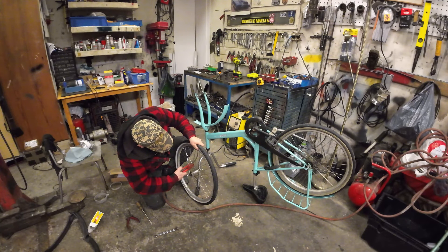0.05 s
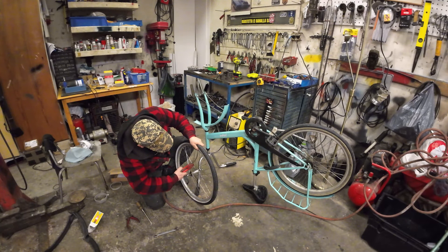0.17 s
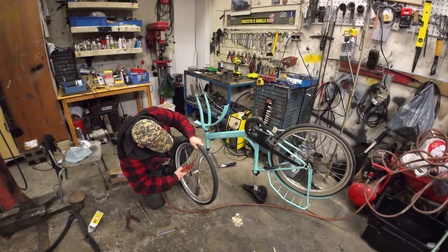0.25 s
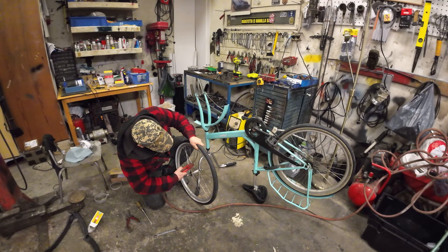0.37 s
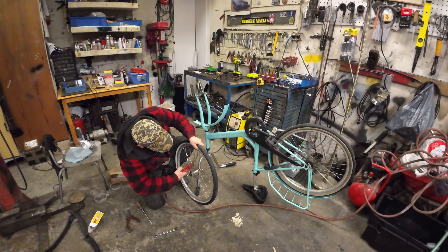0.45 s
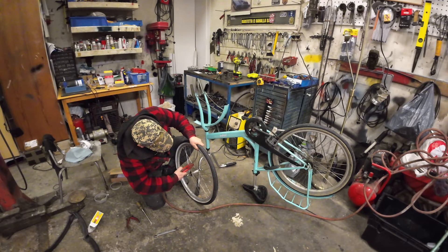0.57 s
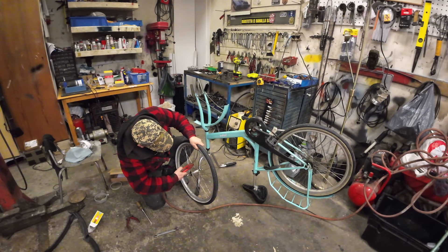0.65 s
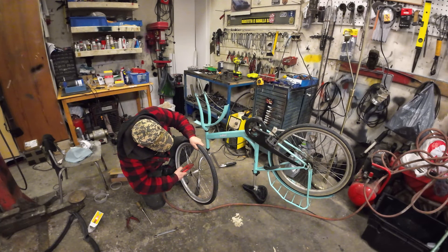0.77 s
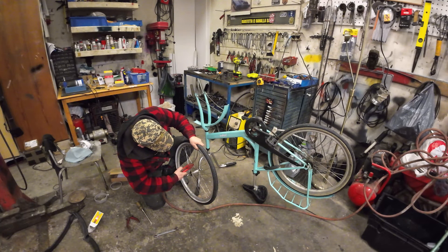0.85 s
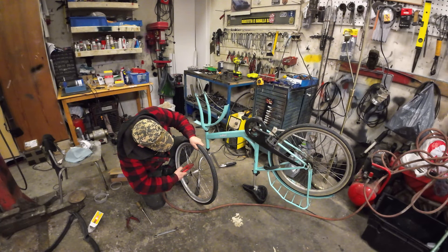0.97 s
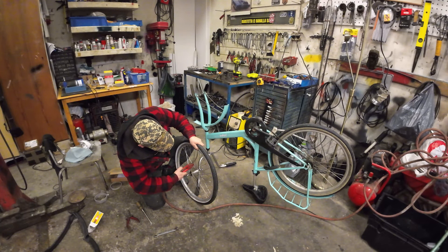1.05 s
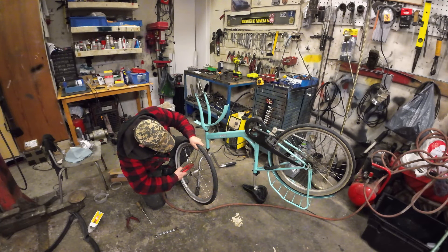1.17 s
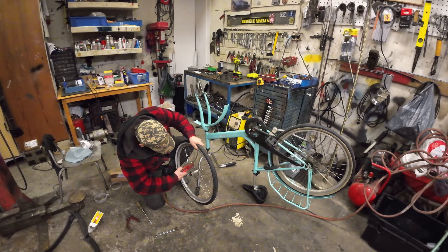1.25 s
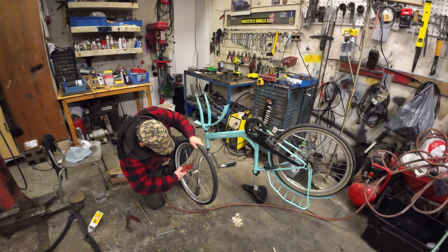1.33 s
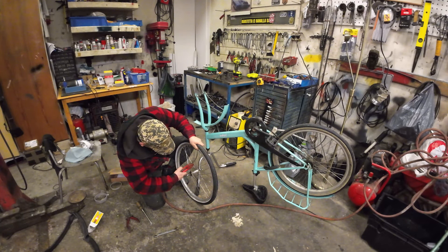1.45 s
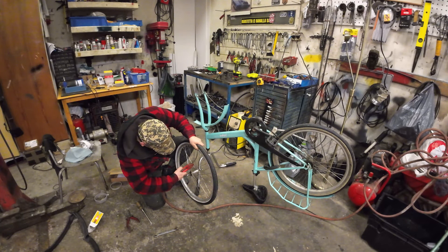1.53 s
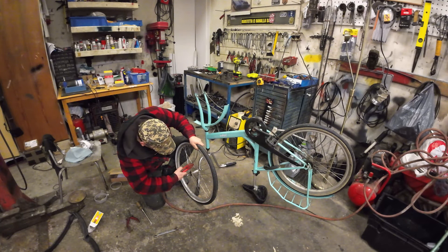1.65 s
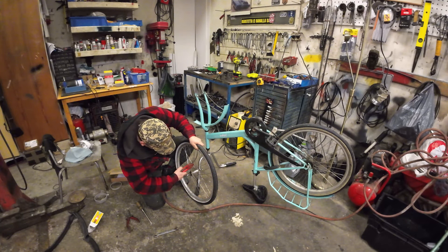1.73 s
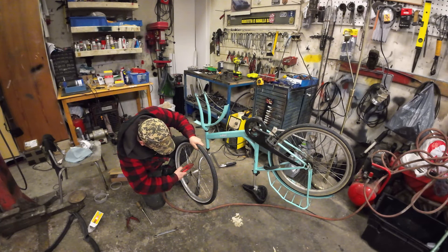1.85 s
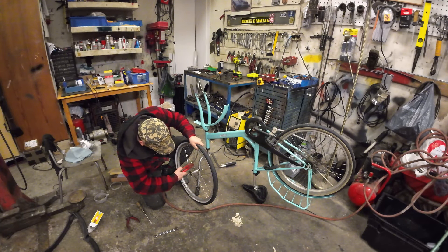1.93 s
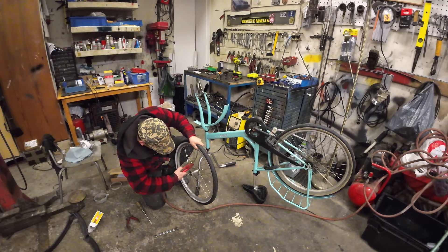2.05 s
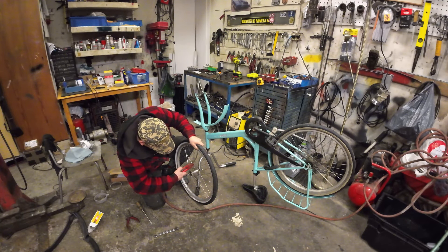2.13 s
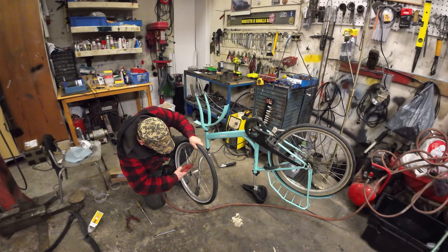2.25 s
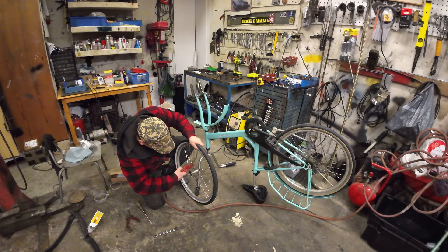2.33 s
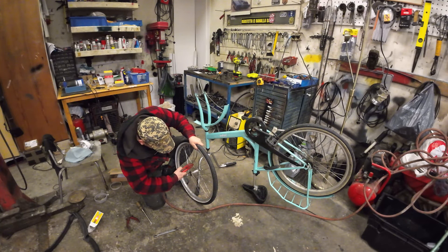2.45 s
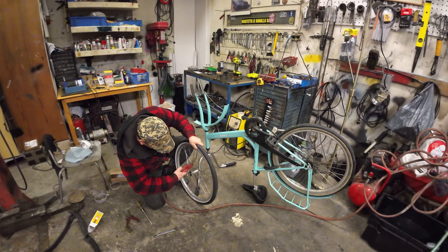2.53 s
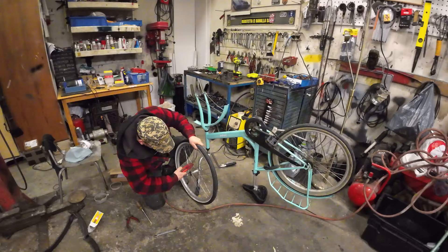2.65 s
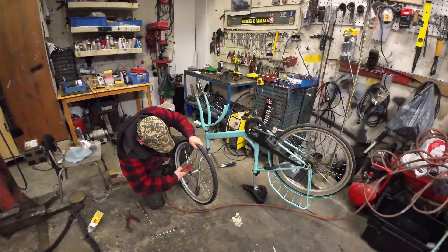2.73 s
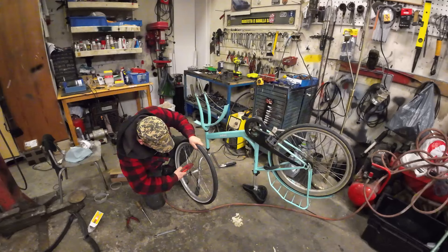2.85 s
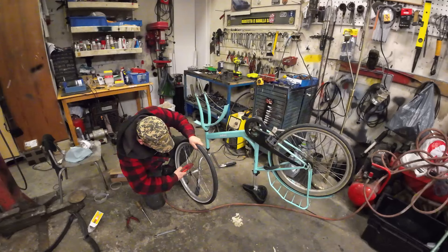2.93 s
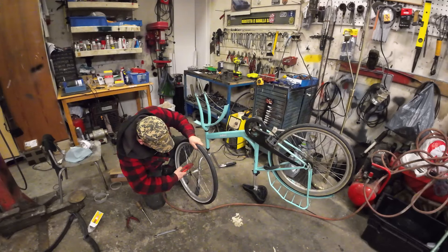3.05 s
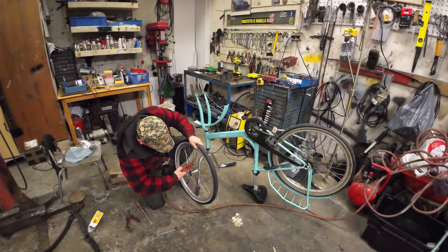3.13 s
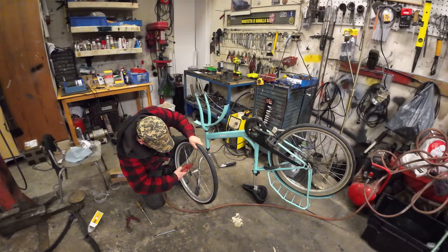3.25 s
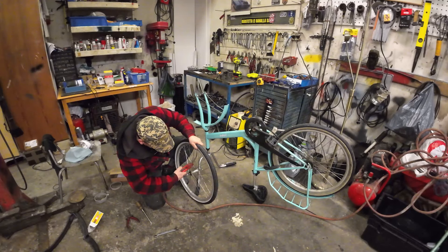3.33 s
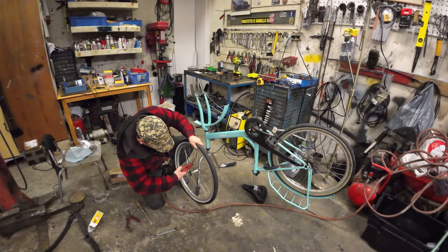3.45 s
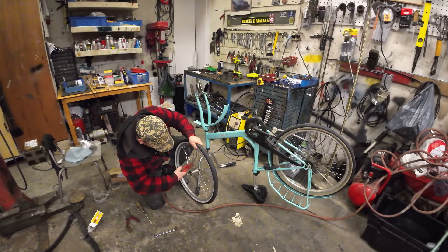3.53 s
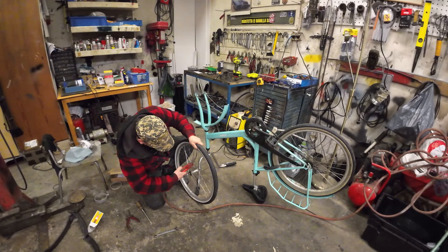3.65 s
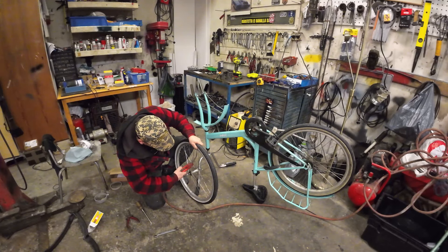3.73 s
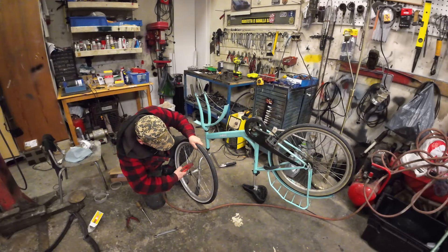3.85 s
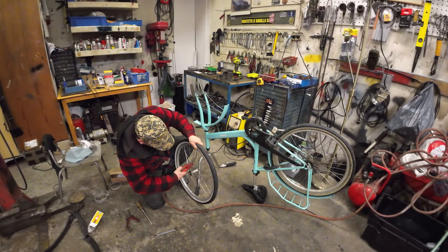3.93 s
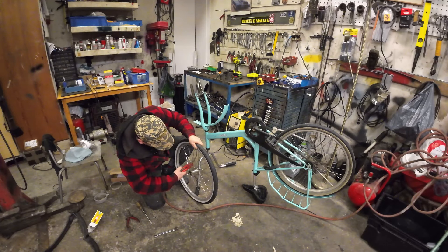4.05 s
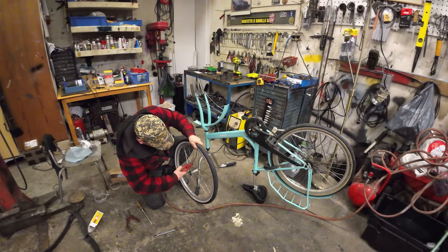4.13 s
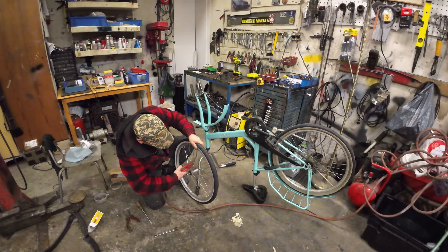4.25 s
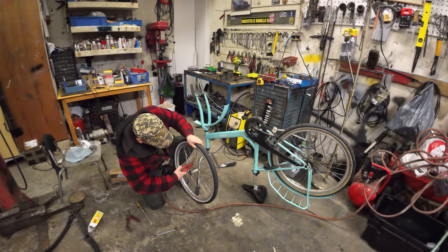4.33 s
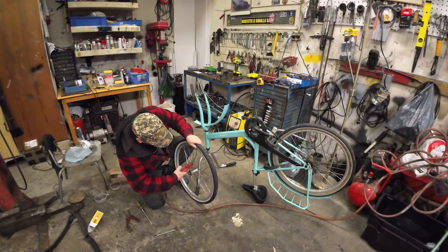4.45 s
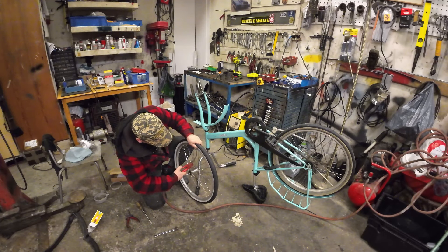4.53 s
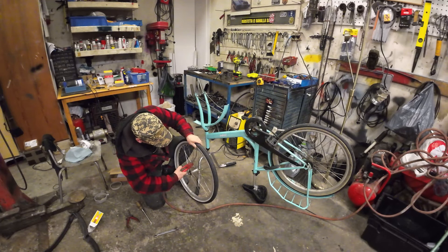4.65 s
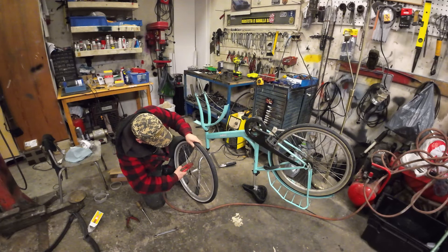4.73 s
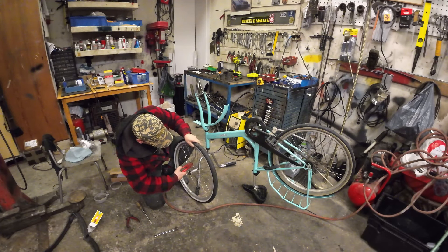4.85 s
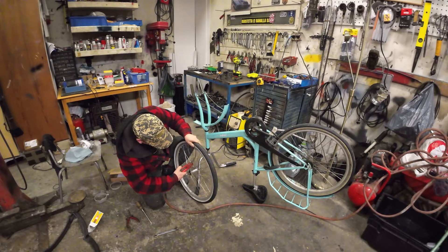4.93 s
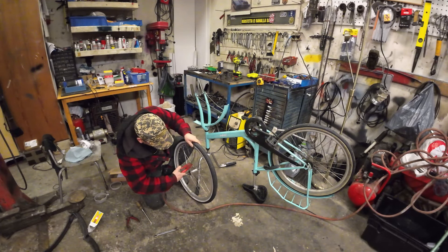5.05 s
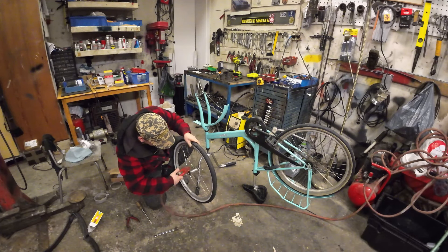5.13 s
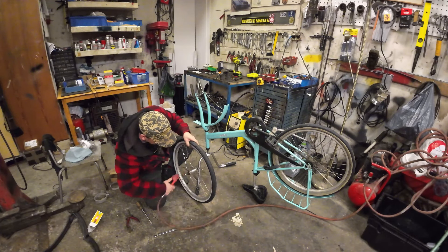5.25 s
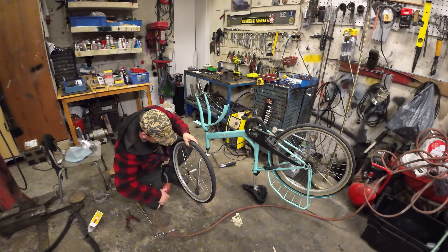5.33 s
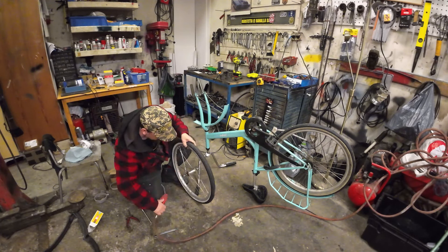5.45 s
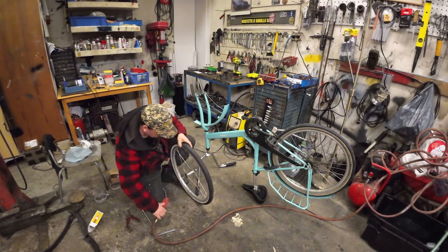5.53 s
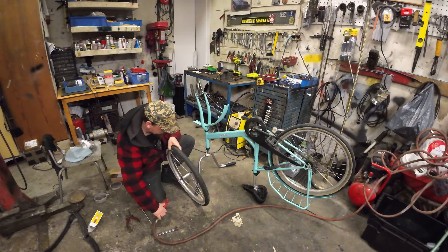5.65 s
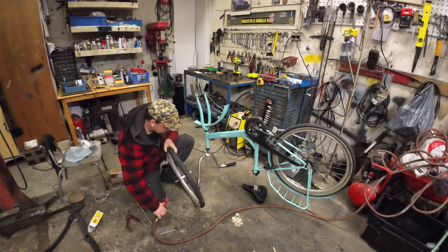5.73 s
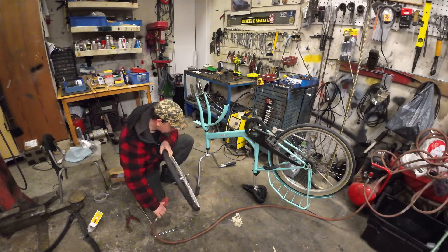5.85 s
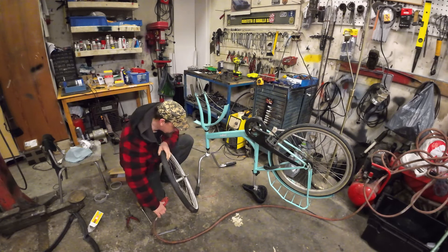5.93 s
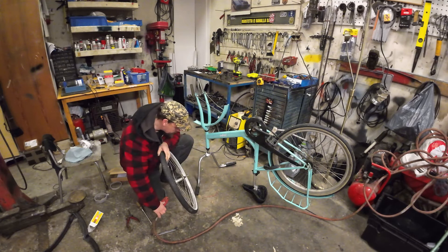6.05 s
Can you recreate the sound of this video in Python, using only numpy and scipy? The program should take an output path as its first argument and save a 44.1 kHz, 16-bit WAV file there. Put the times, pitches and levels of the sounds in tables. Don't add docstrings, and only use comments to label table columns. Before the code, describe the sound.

An air hose fills a bicycle tyre in a garage: sharp rushing hiss stops and restarts, then the nozzle pops off with clicks and cloth rustle.

```python
import sys
import numpy as np
from scipy import signal
from scipy.io import wavfile
from scipy.ndimage import uniform_filter1d

SR = 44100
rng = np.random.default_rng(int(sys.argv[2]) if len(sys.argv) > 2 else 0)


def pcm_store(signal):
    levels = np.round(np.clip(np.atleast_2d(signal), -1, 1) * 32767)
    wavfile.write(sys.argv[1], SR, levels.astype(np.int16).T)


def makeup_ratio(level_db):
    decades = np.asarray(level_db, float) / 20
    return 10 ** decades


N = 268568
FRAME_SAMPLES, STEP_SAMPLES = 512, 8

# opening in [s], shutting in [s], jet level in [dB],
# easing off before the shut in [s], first lift of the seat cavities in [dB].
PRESSES = [
    (-1.0, -0.034, -37.0, .05, -8),
    (0.141, 2.262, -33.1, .07, -1),
    (2.368, 3.47, -35.2, .14, 8),
    (3.6, 4.192, -36.5, .045, 3),
]
# frequency in [Hz], density in [dB per Hz].
JET_SPECTRUM = [(2060, -16), (3500, 0), (4550, -14), (5190, 3), (6800, 2), (7900, 2.05), (8630, 1.5),
                (9360, 4.5), (10300, 6.5), (12400, 4), (13800, 1), (14600, 5.5), (15300, 6.5), (15900, -1)]
# frequency in [Hz], density in [dB per Hz].
BODY_SPECTRUM = [(180, -46), (300, -7), (630, -7), (788, -2.5), (1180, -0.5), (2000, -2.5), (2350, -2),
                 (2620, -1), (3050, -5), (3950, -4.5), (5000, -6), (6500, -21), (11000, -120)]
# centre in [Hz], width in [Hz], steady lift in [dB], share of the seat lift in [0-1].
CAVITIES = [(816, 100, 1.5, .3), (1750, 130, 0, 0.44), (1970, 250, -1, .9), (2630, 540, 2.5, 0.5),
            (5050, 130, 3, 0.07), (7830, 390, 2.5, .4), (9300, 150, -3, 0.5), (9480, 250, 0.7, 0.84),
            (10600, 300, 2.5, 0.3), (11760, 170, 3.5, .3), (13300, 160, 1, .1), (14900, 200, 2.5, .1),
            (16000, 180, 0, .05)]
# frequency in [Hz], likeness in [0-1].
LEAK_LIKENESS = [(60, 0.51), (92, 0.54), (140, 0.58), (210, 0.57), (330, 0.6), (500, 0.95), (770, 1),
                 (1170, 1), (1790, 1), (2740, 1), (4190, 0.8), (6410, 0.61), (9810, 0.7), (15000, 0.8)]
# frequency in [Hz], lead in [rad].
LEFT_LEAD = [(0, 0), (4650, 0.0), (5860, 0.4), (6630, 0.2), (7920, 0.4), (8270, 0.3), (10200, 0.9),
             (10500, 0.9), (11600, 0.7), (12900, 0.2), (13200, 0.3), (14600, 0.8), (15400, 0.2),
             (16500, 0.1)]
# frequency in [Hz], left minus right in [dB].
LEFT_TILT = [(60, 14), (110, 13), (200, -2), (380, 2.5), (700, 0), (1290, 0.5), (2380, 0.5), (4400, 3),
             (8120, -1.5), (15000, 0.5)]
# time in [s], peak in [dB], brightness in [dB], T60 in [s].
PUFFS = [
    (5.1876, -32, -6, 0.035),
    (5.1946, -32.5, -7, 0.046),
    (5.2022, -39, -10, 0.045),
    (5.214, -37, -9, 0.033),
    (5.228, -48, -14, 0.06),
]
# resonance in [Hz], width in [Hz], level in [dB].
THROAT = [(800, 250, -12), (1780, 160, -4.5), (2250, 340, -1.5), (2740, 200, -2), (3550, 410, -4),
          (5330, 780, -2), (6330, 450, -2.5), (7630, 760, -4.5), (9600, 1300, -8), (11600, 1100, -8),
          (14500, 1500, -12)]
# time in [s], peak in [dB], centre in [Hz],
# width re centre in [ratio], bright edge in [dB].
KNOCKS = [(4.376, -46, 1900, 0.94, -16), (4.596, -54, 1480, .5, -27), (4.643, -41.5, 1980, 1.1, -12),
          (4.716, -50.5, 1100, 0.9, -21), (4.82, -52, 3160, .6, -27), (5.11, -53, 6750, .3, -16),
          (5.116, -55, 1500, 1.3, -20), (5.187, -43, 6300, .8, -11), (5.263, -45, 1400, 1.1, -22),
          (5.408, -48.5, 1050, .8, -26), (5.47, -44, 2100, 0.9, -13), (5.5, -55, 2700, 0.25, -22),
          (5.875, -59, 2400, .3, -26)]
# start in [s], hold in [s], level in [dB], fall in [dB per s],
# weight under 800 Hz in [dB].
MOVES = [(0.0, .1, -69, 60, -10), (3.5, .12, -63, 150, -1), (4.17, .11, -57.5, 75, 0.5),
         (4.3, .1, -62.5, 220, -4), (4.45, .1, -73, 100, -8), (4.588, .04, -66, 150, -7),
         (4.645, .08, -66, 90, 0.5), (4.77, .08, -67, 200, -14), (5.102, .018, -63, 600, -11),
         (5.19, .07, -58.5, 115, -4), (5.33, .13, -71, 60, -1), (5.466, .07, -54.5, 85, -5.5),
         (5.72, .1, -68.5, 40, -13), (5.87, .015, -66, 300, -16), (5.925, .03, -67, 55, -13)]
# frequency in [Hz], density in [dB per Hz].
RUSTLE_SPECTRUM = [(90, -25), (200, -11.5), (450, -1), (880, -6.5), (1500, -12), (2670, -11.5),
                   (4420, -18.5), (5900, -13.5), (7000, -19.5), (11200, -17.5), (13500, -30), (15800, -28)]
# frequency in [Hz], T60 in [s].
GARAGE_T60 = [(100, 0.25), (1000, 0.3), (4000, 0.6), (15000, 0.36)]
# multiple of the mains in [1], level in [dB rms].
HUM = [
    (2, -71.5),
    (6, -72.5),
    (8, -72.5),
    (10, -82),
    (14, -88.5),
    (24, -80),
    (28, -86),
    (31, -83),
    (39, -86),
]
# frequency in [Hz], density in [dB per Hz].
FLOOR_SPECTRUM = [(59, -27), (100, 1), (243, -11), (300, -6.5), (348, -17), (395, -5), (629, -20.5),
                  (1110, -16.5), (1210, -11.5), (1470, -17), (1810, -17), (4590, -24), (6040, -17.5),
                  (6580, -28), (15600, -31.5)]
# frequency in [Hz], likeness in [0-1].
FLOOR_LIKENESS = [(60, 0.02), (130, 0), (290, 0.6), (640, 0.67), (1410, 0.79), (3100, 0.7), (6820, 0.35),
                  (15000, 0)]

SNAP_S, SWELL_S, SWELL_DB = .015, .045, 9.5
SURGE_DB, SURGE_AT_S, SURGE_WIDTH_S, SURGE_FADES_S = 2.9, .14, .13, 2.5
SAG_DB, SAG_S, EASE_DB = 3.1, .8, 5.3
SEAT_REST_DB, SEAT_SETTLES_S = 3.0, 1.1
JET_FALL_DB_PER_S, BODY_FALL_DB_PER_S = 285, 122
BODY_DB, BODY_LATE_DB, BODY_LATE_S, BODY_SURGE_DB_PER_DB = -6.3, 8, .035, .7
RUMBLE_DB, RUMBLE_SAG_DB_PER_S, RUMBLE_GUSTS_DB = -45.7, 1.5, 1.5
RUMBLE_DB_PER_DB = 2.1
SEAT_SURGE_DB_PER_DB, RUMBLE_SURGE_DB_PER_DB = 1.3, 1.0
SEAT_SHIELD_DB_PER_DB = .6
PUSH_DB, STILL_AIR_DB, PUSH_GUSTS_DB, PUSH_SAG_DB_PER_S = -4.5, -67.5, 2.1, 1.3
KNOCK_T60_S, NARROW_T60_S = .006, .004
MOVE_ATTACK_S, GRIT_S, CATCHES_PER_S = .007, .004, 130
RIM_FROM_S, RIM_HZ, RIM_WIDTH_HZ, RIM_DB = 5.55, 2490, 110, -77.5
MAINS_HZ, FLOOR_DB = 50., -63


def rms_one(x):
    return x / np.sqrt(np.mean(x ** 2) + 1e-20)


def at_hz(points, hz):
    table = np.array(points)
    return np.interp(np.log(hz + 1), np.log(table[:, 0] + 1), table[:, 1])


def patches(shape, wide, long):
    field = rng.standard_normal(shape)
    for _ in range(2):
        field = uniform_filter1d(uniform_filter1d(field, wide, axis=0), long, axis=1)
    return rms_one(field)


def in_full(control):
    return np.repeat(control, STEP_SAMPLES)[:N]


def butter(x, order, hz, kind):
    return signal.sosfilt(signal.butter(order, hz, kind, fs=SR, output="sos"), x)


def resonance(x, hz, width_hz):
    r = np.exp(-np.pi * width_hz / SR)
    poles = [1, -2 * r * np.cos(2 * np.pi * hz / SR), r * r]
    return signal.lfilter([(1 - r * r) / 2, 0, (r * r - 1) / 2], poles, x)


def double_resonance(x, hz, width_hz):
    return resonance(resonance(x, hz, width_hz), hz, width_hz)


def air_noise(spectrum, likeness, patchy_db, surge_db, cavity_lift_db=None):
    white = rng.standard_normal((2, N + FRAME_SAMPLES))
    hz, s, (mid, side) = signal.stft(white, SR, nperseg=FRAME_SAMPLES)
    colour_db = at_hz(spectrum, hz)[:, None]
    if cavity_lift_db is not None:
        lift_db = np.interp(s, np.arange(N) / SR, cavity_lift_db)
        for centre_hz, width_hz, steady_db, share in CAVITIES:
            peak_db = steady_db + share * lift_db + 0.62 * patches((1, len(s)), 1, 40)
            colour_db = colour_db + peak_db / (1 + (2 * (hz[:, None] - centre_hz) / width_hz) ** 2)
    eddies_db = patchy_db * patches(mid.shape, 9, 12)
    gusts_db = surge_db * patches(mid.shape, 120, 4)
    gain = makeup_ratio(colour_db + eddies_db + gusts_db)
    alike = np.clip(at_hz(likeness, hz), 0, 1)[:, None]
    turn = np.exp(.5j * at_hz(LEFT_LEAD, hz))[:, None] * makeup_ratio(at_hz(LEFT_TILT, hz) / 2)[:, None]
    shared, apart = np.sqrt(1 + alike) * mid, np.sqrt(1 - alike) * side
    pair = gain * np.array([(shared + apart) * turn, (shared - apart) / turn])
    return rms_one(signal.istft(pair, SR, nperseg=FRAME_SAMPLES)[1][:, :N])


def flow():
    t = np.arange(0, N, STEP_SAMPLES) / SR
    opens, shuts, level_db, ease_s, first_seat_db = np.transpose(PRESSES)[:, :, None]
    age = np.maximum(t - opens, 0)
    after = np.maximum(t - shuts, 0)
    stored = np.exp(-np.abs(opens) / SURGE_FADES_S)
    surge_db = SURGE_DB * stored * np.exp(-((age - SURGE_AT_S) / SURGE_WIDTH_S) ** 2)
    seat_db = SEAT_REST_DB + (first_seat_db - SEAT_REST_DB) * np.exp(-age / SEAT_SETTLES_S)

    snap_db = 20 * np.log10(np.clip(age / SNAP_S, 1e-9, 1))
    swell_db = SWELL_DB * np.exp(-age / SWELL_S)
    easing_db = EASE_DB * np.clip(1 + (t - shuts) / ease_s, 0, 1) ** 2
    strain_db = snap_db + surge_db - swell_db - easing_db
    held_db = level_db - SAG_DB * stored * (1 - np.exp(-age / SAG_S)) + strain_db

    jet_db = held_db - JET_FALL_DB_PER_S * after
    late_db = BODY_LATE_DB * np.exp(-age / BODY_LATE_S)
    body_db = held_db + BODY_DB + BODY_SURGE_DB_PER_DB * surge_db - late_db - BODY_FALL_DB_PER_S * after
    overload_db = RUMBLE_DB_PER_DB * (strain_db - JET_FALL_DB_PER_S * after)
    overload_db = overload_db + RUMBLE_SURGE_DB_PER_DB * surge_db - SEAT_SHIELD_DB_PER_DB * seat_db
    overload_db = overload_db.max(axis=0) + RUMBLE_DB - RUMBLE_SAG_DB_PER_S * t
    lift_db = seat_db + SEAT_SURGE_DB_PER_DB * surge_db
    lift_db = np.take_along_axis(lift_db, jet_db.argmax(axis=0)[None], axis=0)[0]
    return [in_full(db) for db in (jet_db.max(axis=0), body_db.max(axis=0), overload_db, lift_db)]


def leak(jet_db, body_db, lift_db):
    jet = air_noise(JET_SPECTRUM, LEAK_LIKENESS, patchy_db=0.45, surge_db=0.5, cavity_lift_db=lift_db)
    body = air_noise(BODY_SPECTRUM, LEAK_LIKENESS, patchy_db=-0.24, surge_db=0.57, cavity_lift_db=lift_db)
    return makeup_ratio(jet_db) * jet + makeup_ratio(body_db) * body


def microphone_rumble(overload_db):
    shared, *own = rng.standard_normal((3, N))
    treble = butter(shared + 0.49 * np.array(own), 2, [9000, 13000], "band")
    square = -rms_one(treble * makeup_ratio(1.3 * patches((1, N), 1, 60))) ** 2
    low = butter(square - square.mean(), 1, [40, 1500], "band")
    gusts = makeup_ratio(overload_db + RUMBLE_GUSTS_DB * patches((1, N), 1, 1500))
    port_gain = makeup_ratio(np.array([[4.4], [3.4]]))
    return gusts * port_gain * rms_one(low)


def dying_burst(t60_s):
    age = np.arange(SR // 4) / SR
    return rng.standard_normal(SR // 4) * makeup_ratio(-60 * age / max(t60_s, .003))


def add(out, s, peak_db, sound):
    out[round(s * SR):][:len(sound)] += makeup_ratio(peak_db) * sound / np.abs(sound).max()


def add_puffs(out):
    for s, peak_db, bright_db, t60_s in PUFFS:
        burst = dying_burst(t60_s)
        puff = 0
        for k, (hz, width_hz, db) in enumerate(THROAT):
            gain = (-1) ** k * makeup_ratio(db + (bright_db + 7.5) * (hz > 4500)) / np.sqrt(width_hz)
            puff = puff + gain * double_resonance(burst, hz, 1.5 * width_hz)
        add(out, s, peak_db - 2.0, puff)


def add_knocks(out):
    for s, peak_db, centre_hz, wide, edge_db in KNOCKS:
        burst = dying_burst(KNOCK_T60_S + NARROW_T60_S / wide)
        body = double_resonance(burst, centre_hz, wide * centre_hz)
        edge = butter(burst, 4, 6500, "high")
        add(out, s, peak_db + 0.5, rms_one(body) + makeup_ratio(edge_db + 10) * rms_one(edge))


def puffs_and_knocks():
    out = np.zeros(N + SR // 4)
    add_knocks(out)
    add_puffs(out)
    return out[:N] * makeup_ratio(np.array([[-.3], [.3]]))


def rustle():
    s, hold_s, peak_db, fall_db_per_s, weight_db = np.transpose(MOVES)[:, :, None]
    age = np.arange(0, N, STEP_SAMPLES) / SR - s
    after = np.maximum(age - hold_s, 0)
    moves = np.clip(age / MOVE_ATTACK_S, 0, 1) * makeup_ratio(peak_db - fall_db_per_s * after)
    level = np.sqrt(np.sum(moves ** 2, axis=0))
    weight = np.sqrt(np.sum((moves * makeup_ratio(weight_db)) ** 2, axis=0))

    noise = air_noise(RUSTLE_SPECTRUM, FLOOR_LIKENESS, patchy_db=1.0, surge_db=-0.5)
    catches = (rng.random(N) < CATCHES_PER_S / SR) * makeup_ratio(2.1 * np.minimum(rng.exponential(1, N), 3))
    grit = 1.8 + signal.lfilter([1], [1, -np.exp(-1 / (GRIT_S * SR))], catches)
    noise = rms_one(noise * grit)
    treble = butter(noise, 4, 4500, "high")
    middle = butter(noise, 2, [800, 4500], "band")
    bass = butter(noise, 4, 800, "low")
    return makeup_ratio(1.5) * (in_full(level) * (middle + treble) + in_full(weight) * makeup_ratio(7) * bass)


def rim_ring():
    band = double_resonance(rng.standard_normal(N), RIM_HZ, RIM_WIDTH_HZ)
    fade_in = np.clip((np.arange(N) / SR - RIM_FROM_S) / .03, 0, 1)
    return makeup_ratio(RIM_DB) * fade_in * rms_one(band)


def garage(x):
    hz, s, tail = signal.stft(rng.standard_normal((2, SR // 2)), SR, nperseg=FRAME_SAMPLES)
    decay = makeup_ratio(-60 * s / at_hz(GARAGE_T60, hz)[:, None])
    tail = signal.istft(tail * decay, SR, nperseg=FRAME_SAMPLES)[1]
    tail[:, :round(.006 * SR)] = 0
    tail = tail / np.sqrt(np.sum(tail ** 2, axis=1, keepdims=True))
    return signal.fftconvolve(x, tail, axes=1)[:, :N]


def hum():
    t = np.arange(N) / SR
    total = 0
    for multiple, db in HUM:
        sway = makeup_ratio(db + 2.1 * patches((1, N), 1, 1800))
        total = total + sway * np.sin(2 * np.pi * (round(multiple) * MAINS_HZ * t + rng.random()))
    return np.sqrt(2) * total


def deep_push(overload_db):
    shared, *own = rng.standard_normal((3, N))
    deep = butter(1.1 * shared + np.array(own), 1, [7, 65], "band")
    deep = butter(deep, 2, 130, "low") * makeup_ratio(np.array([[-.4], [.4]]))
    push_db = overload_db + PUSH_DB - PUSH_SAG_DB_PER_S * np.arange(N) / SR
    gusts = makeup_ratio(2.5 + PUSH_GUSTS_DB * patches((1, N), 1, 3500))
    return np.hypot(makeup_ratio(push_db), makeup_ratio(STILL_AIR_DB)) * gusts * rms_one(deep)


def draught():
    air = rng.standard_normal(N) + 0.93 * rng.standard_normal((2, N))
    return makeup_ratio(-57 + 1.3 * patches((1, N), 1, 5000)) * rms_one(butter(air, 2, [4, 17], "band"))


def room_floor():
    return makeup_ratio(FLOOR_DB - 3) * air_noise(FLOOR_SPECTRUM, FLOOR_LIKENESS, patchy_db=0.7, surge_db=-0.9)


def scene():
    jet_db, body_db, overload_db, lift_db = flow()
    air = leak(jet_db, body_db, lift_db)
    clicks = puffs_and_knocks()
    echoes = garage(makeup_ratio(-8) * air + makeup_ratio(-1.5) * clicks)
    near = makeup_ratio(1.44) * air + clicks + rustle() + rim_ring()
    at_microphone = microphone_rumble(overload_db) + deep_push(overload_db)
    return near + echoes + at_microphone + hum() + draught() + room_floor()


def top_cut(x):
    return signal.sosfilt(signal.butter(12, 16980, fs=SR, output="sos"), x)


def record(dry):
    mix = signal.sosfilt(signal.ellip(12, .5, 70, 15725, fs=SR, output="sos"), dry)
    return top_cut(mix)


dry = scene()
out = record(dry)
pcm_store(out)
```